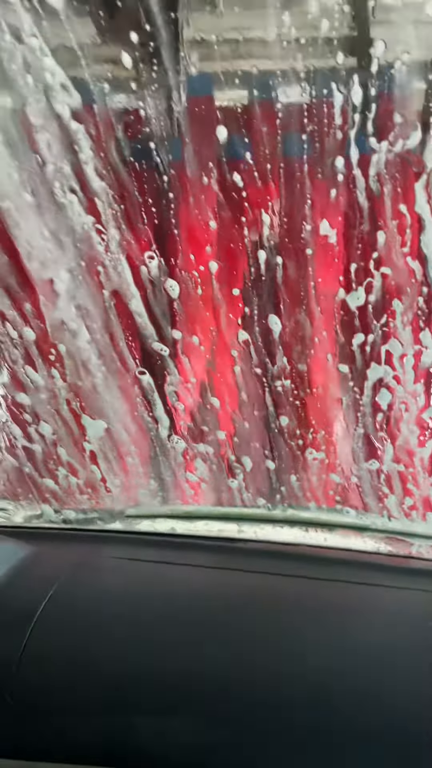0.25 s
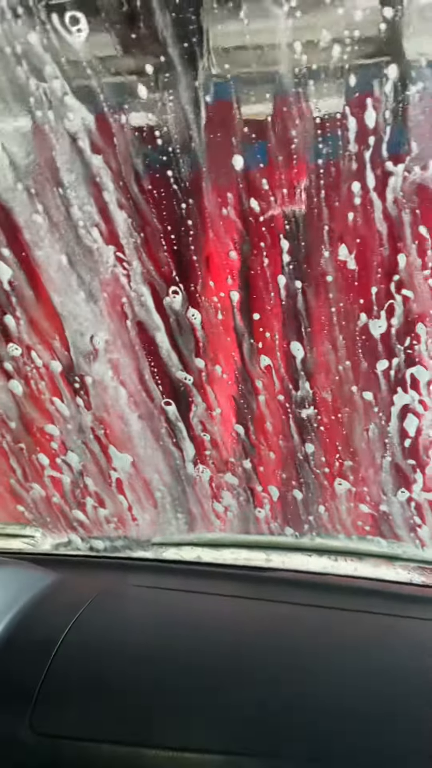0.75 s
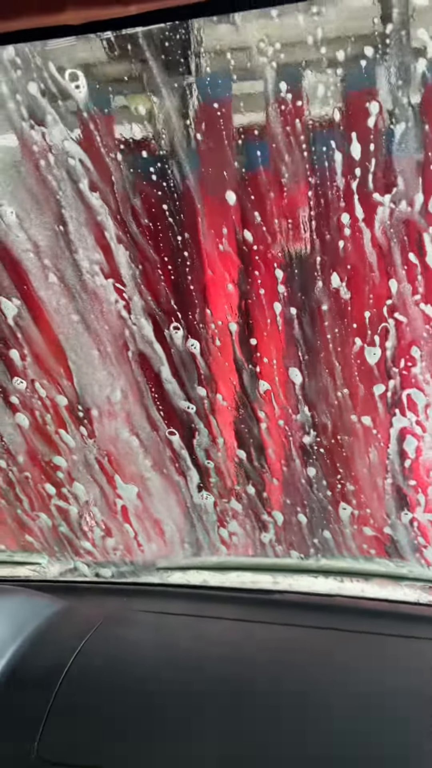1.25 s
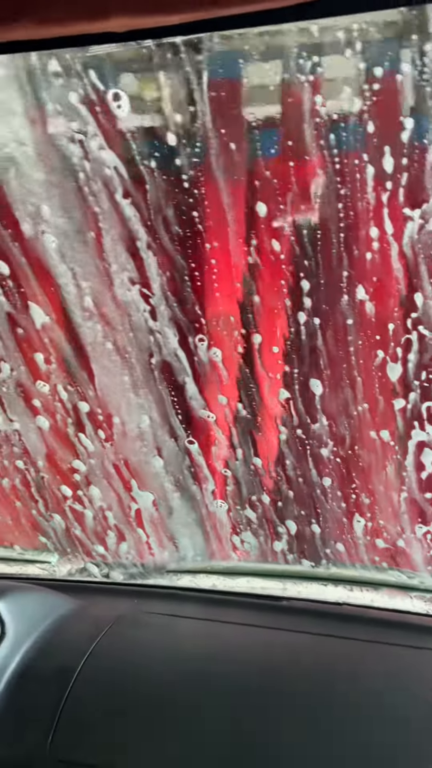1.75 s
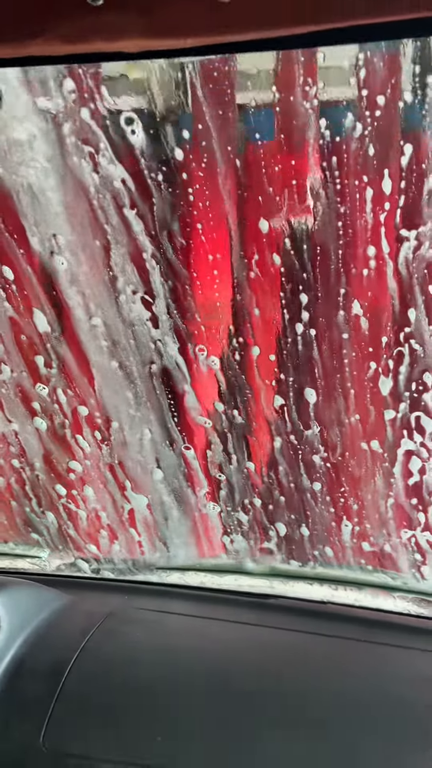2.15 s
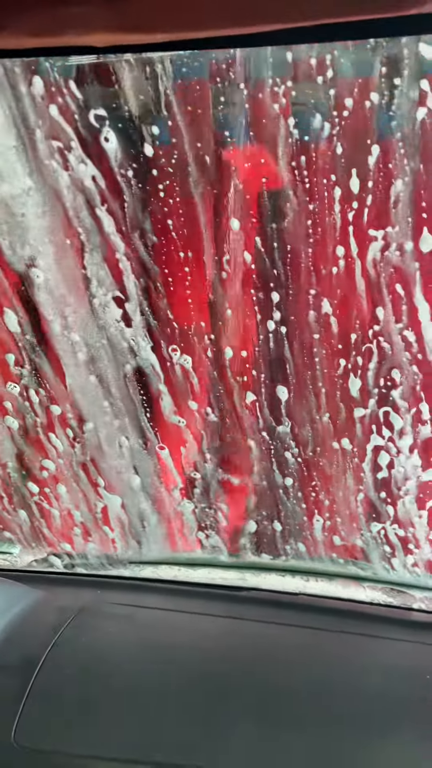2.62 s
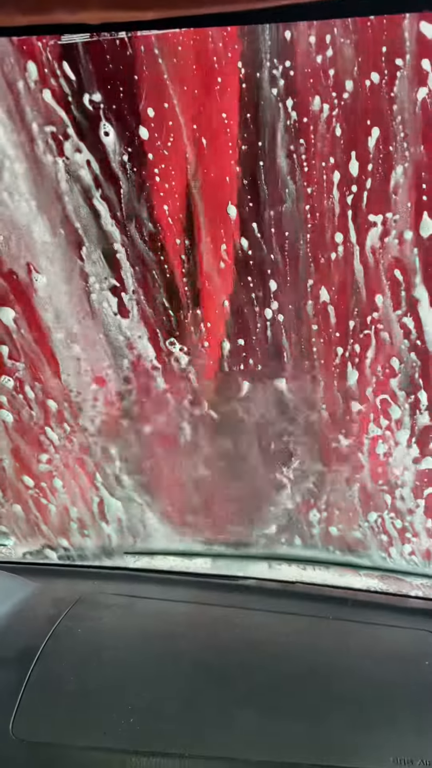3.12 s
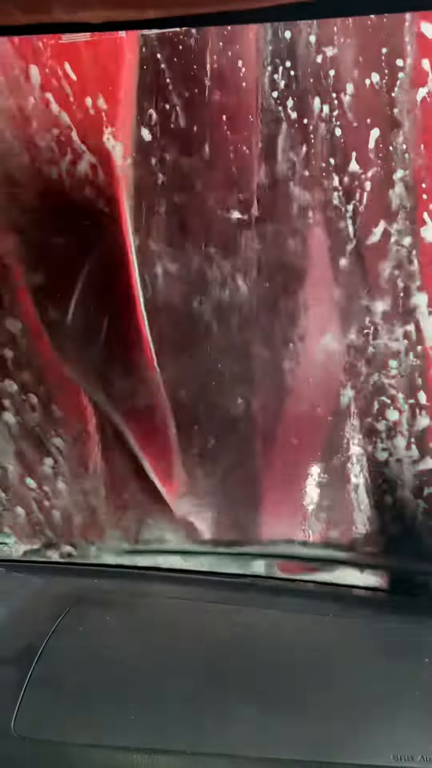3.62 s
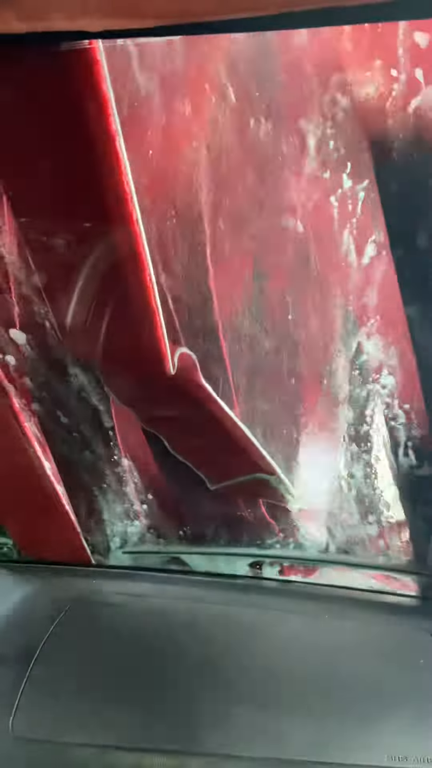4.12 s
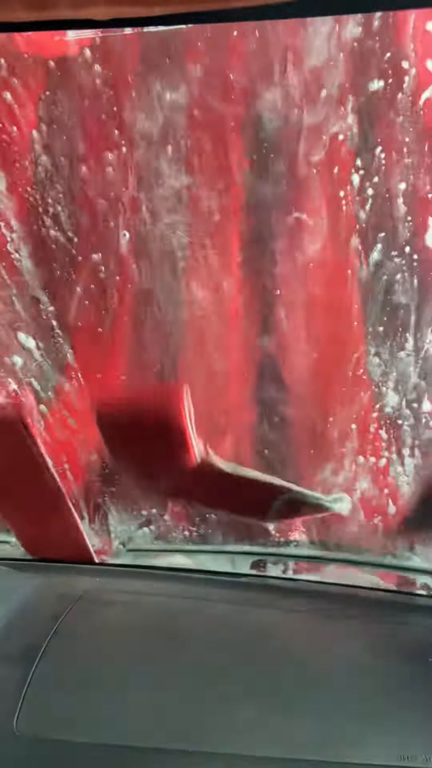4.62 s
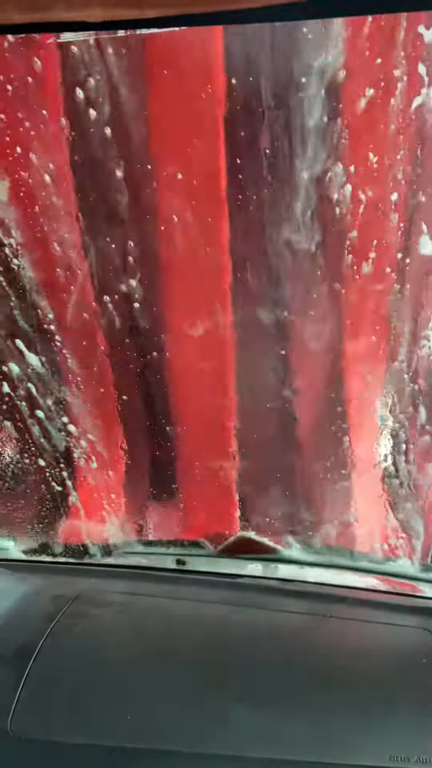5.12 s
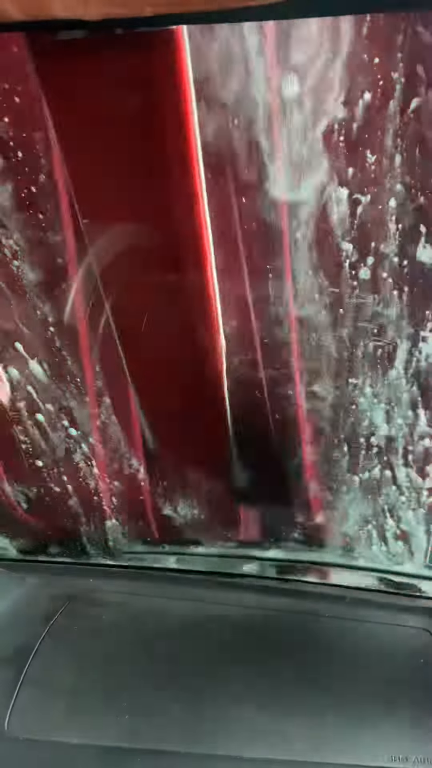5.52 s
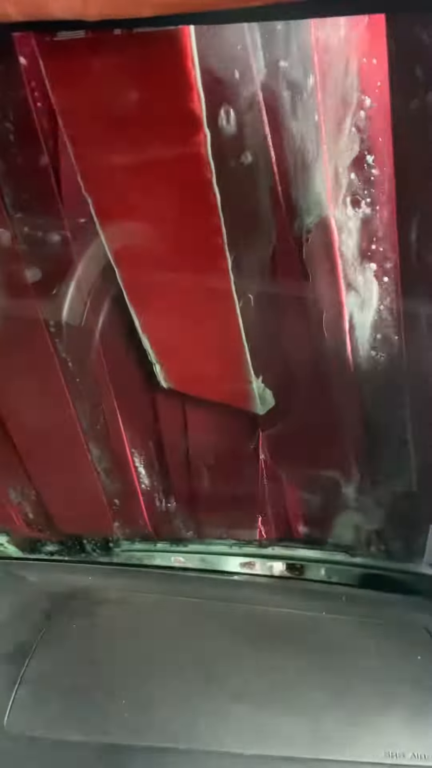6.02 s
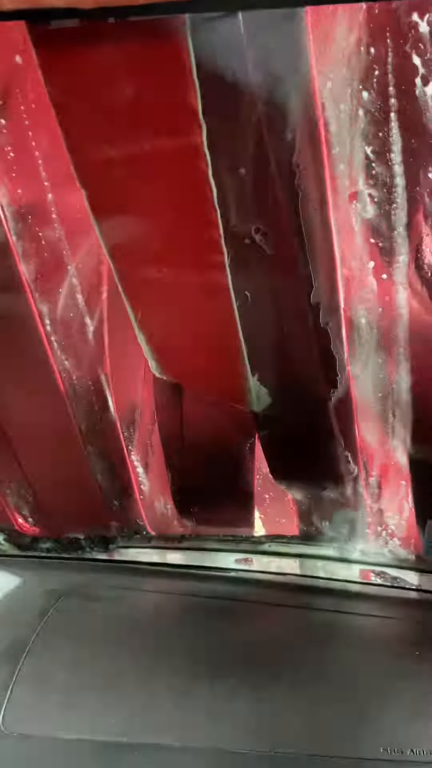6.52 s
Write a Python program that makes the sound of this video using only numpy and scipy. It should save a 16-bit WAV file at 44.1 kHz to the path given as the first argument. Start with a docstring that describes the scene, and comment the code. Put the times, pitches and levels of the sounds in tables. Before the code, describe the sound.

Soaked brush strips whip and thud against a car's glass and panels, water hissing and pattering, above a muffled boom of machinery.

```python
"""Wet swishes over a low rumble: the inside of a closed car while a spinning brush washes it.
Cloth strips whip the car: bursts of random drops splash, ping and hiss on the glass and drum the panels.
Some strips slap flat or crack at their tips; thuds and knocks, strong and faint, ring the shell's own notes.
Behind them, filtered noise makes the boom and drumming of pumps and fans, and random drops the running
water. Two close microphone ports listen."""
import sys
import numpy as np
from scipy import signal
from scipy.fft import rfft, irfft, next_fast_len
from scipy.io import wavfile
from scipy.ndimage import uniform_filter1d

SR = 44100
rng = np.random.default_rng(int(sys.argv[2]) if len(sys.argv) > 2 else 0)


def unload_audio(sound):
    """Save the sound as a 16-bit wav file, at the path given as the first command line argument."""
    columns = np.transpose(np.atleast_2d(sound))
    # keep every value between -1 and 1, then stretch to whole-number steps
    steps = np.round(np.clip(columns, -1, 1) * 32767)
    wavfile.write(sys.argv[1], SR, steps.astype(np.int16))


N = 297674
T = np.arange(N) / SR                      # time [s]
SIZE = next_fast_len(N + SR // 10)         # a little spare room, so filters do not wrap round
HZ = np.maximum(np.arange(SIZE // 2 + 1) * SR / SIZE, 1)

# Cloth swishes, slopes before sharpening:
# (time of the top [s], spray level [dB], swell [dB/s], fade [dB/s], extra dull splash and panel sound [dB])
CLOTH_SWISHES = [(0.005, -39, 500, 205, 5.5), (0.1, -41.5, 1609, 100, 1), (0.223, -34.5, 470, 252, 0.5),
                 (0.345, -35, 422, 144, 1), (0.485, -38.5, 400, 300, 5), (0.536, -38, 1103, 132, 6.5),
                 (0.638, -37.5, 1200, 250, 3), (0.688, -35.5, 2000, 393, -6), (0.74, -44.5, 500, 252, -3),
                 (0.86, -41.5, 300, 75, 0), (1.02, -43.5, 302, 152, -6), (1.1, -47, 200, 200, -2),
                 (1.2, -39.5, 502, 103, -4), (1.385, -34, 205, 296, -13), (1.47, -38, 306, 137, -3.5),
                 (1.646, -30.5, 400, 298, -6), (1.738, -29.5, 901, 100, -1.5), (1.881, -32.5, 142, 192, 1),
                 (1.925, -38, 400, 498, 7), (1.962, -33.5, 2500, 120, 7), (1.99, -29.5, 400, 200, 5),
                 (2.104, -25.5, 650, 196, 5), (2.172, -31, 1200, 200, -5), (2.193, -27.5, 800, 117, 7),
                 (2.3, -29, 500, 117, 7.5), (2.403, -21.5, 650, 155, 6.5), (2.516, -18.5, 357, 300, 6.5),
                 (2.538, -20.5, 600, 500, -13), (2.582, -21, 1100, 245, 0), (2.619, -23.5, 700, 190, 8),
                 (2.66, -32, 498, 120, -8), (2.706, -16, 1100, 220, -1), (2.744, -22, 500, 300, -0.5),
                 (2.791, -21.5, 1198, 302, -2.5), (2.811, -21, 602, 216, -0.5), (2.881, -28, 2000, 300, 9),
                 (2.899, -12, 700, 500, -4), (2.927, -26, 600, 498, -8), (2.966, -32.5, 1200, 200, 4.5),
                 (2.996, -20, 500, 300, -0.5), (3.03, -34, 400, 400, -12), (3.093, -19, 900, 294, 2.5),
                 (3.179, -27, 1200, 300, 7.5), (3.206, -19.5, 1202, 350, -6), (3.264, -28, 1500, 200, 0),
                 (3.293, -30.5, 900, 150, -2), (3.392, -22.5, 700, 257, 2), (3.44, -33, 300, 300, -2.5),
                 (3.488, -41, 2006, 500, 13), (3.517, -14, 700, 350, -3.5), (3.545, -22, 600, 450, -1),
                 (3.631, -28.5, 550, 298, 1.5), (3.774, -24, 340, 402, -2), (3.875, -16.5, 1300, 350, -4.5),
                 (3.904, -23, 500, 400, -11), (3.967, -27.5, 2300, 235, -5.5), (4.12, -32, 600, 114, -6),
                 (4.267, -40, 252, 92, 2), (4.479, -33, 309, 302, 1), (4.574, -38, 600, 150, 5),
                 (4.65, -54, 400, 200, 8), (4.74, -31, 900, 147, -8), (4.988, -36.5, 300, 302, -9),
                 (5.053, -35.5, 200, 500, 2), (5.168, -38.5, 160, 303, 5), (5.485, -28, 798, 797, 2.5),
                 (5.523, -28.5, 898, 400, -1), (5.56, -30.5, 1498, 400, 2.5), (5.596, -37, 900, 500, 9),
                 (5.674, -31.5, 350, 155, 1), (5.794, -27.5, 500, 400, 4.5), (5.918, -30, 353, 350, -1),
                 (5.986, -20, 2500, 370, -26), (6.028, -28.5, 500, 125, 5.5), (6.184, -17, 702, 272, 1.5),
                 (6.256, -26, 2200, 303, 6.5), (6.303, -24, 1203, 200, 2.5), (6.331, -21.5, 400, 294, 2.5),
                 (6.377, -21.5, 2500, 250, 2), (6.415, -24.5, 600, 204, 6), (6.445, -24.5, 300, 350, 2),
                 (6.508, -22, 1500, 121, 3), (6.59, -27.5, 900, 194, -10), (6.62, -21.5, 1198, 252, 0.5),
                 (6.662, -8, 3005, 600, -5.5), (6.678, -16, 1200, 700, -5), (6.71, -20, 1400, 107, -3.5)]
# The brush along the car, read smoothly between rows: (time [s], steady mist between swishes [dB],
# cloth on the panels for a swish of -24.5 dB [dB], sizzle compared with spray [dB])
BRUSH_PATH = [(0, -42.5, -23.5, -17), (.8, -45, -26, -20.5), (1.3, -47, -14.5, -21.5),
              (2.0, -41, -27.5, -19), (2.5, -35.5, -31, -15), (2.8, -44, -21.5, -12.5),
              (3.2, -34.5, -24.5, -16), (3.7, -40.5, -20.5, -13.5), (4.0, -47, -17, -11.5),
              (4.6, -40.5, -25.5, -17.5), (5.1, -43, -28.5, -17.5), (5.4, -37.5, -20.5, -19),
              (5.7, -44.5, -26.5, -15), (6.2, -46.5, -33, -14), (6.75, -30, -23, -16)]
# Strips slapping flat on the glass: (time [s], strength [dB])
FLAT_SLAPS = [(0.21, -23), (0.44, -18), (0.692, -16), (2.612, -13), (2.709, -14.5), (2.899, -6),
              (3.091, -16), (3.179, -21.5), (3.262, -7.5), (3.519, -10), (3.63, -10.5), (3.756, -13),
              (4.472, -18), (4.64, -14), (4.774, -22), (4.905, -16), (5.265, -13.5), (5.335, -16),
              (5.443, -21), (5.492, -20), (6.46, -27), (6.664, -16), (6.736, -12.5)]
# Strip tips cracking on the glass: (time [s], strength [dB])
TIP_CRACKS = [(1.961, -20.5), (3.084, -19), (3.262, -21), (3.381, -35), (3.872, -28), (3.965, -32),
              (4.472, -34), (4.945, -32), (5.274, -20.5), (5.336, -26), (5.442, -14.5), (5.498, -14.5),
              (5.521, -27), (5.984, -29)]
# Low thuds and knocks in the shell, strong and faint:
# (time [s], strength [dB], pitch around which the shell rings most [Hz])
SHELL_THUDS = [(0.206, -1, 68), (0.317, -18, 304), (0.459, -11, 146), (0.688, -5.5, 120),
               (0.719, -18.5, 332), (0.991, -7, 75), (1.302, -18, 340), (1.434, -9.5, 87.6),
               (1.777, -12, 100), (1.871, -14, 144), (2.502, -12, 129), (2.611, -13.5, 332),
               (2.633, -4.5, 133), (2.696, -25, 324), (2.717, -4, 110), (2.873, -5.5, 121), (2.922, -2, 70),
               (3.178, -5, 132), (3.26, -16, 87), (3.458, -1.5, 90), (3.503, -8, 146), (3.528, -7, 105),
               (3.65, -10, 160), (3.661, -4.5, 81), (3.754, -8.5, 209), (3.794, -7, 119), (3.95, -2, 93),
               (3.965, -20, 302), (3.992, -3, 66), (4.016, -0.5, 67.4), (4.093, -9, 124),
               (4.107, -8.5, 137), (4.12, -1, 98), (4.123, -9.5, 69), (4.542, -9, 103), (4.771, -17.5, 330),
               (4.851, -27, 310), (4.855, -8.5, 85.4), (4.956, -5.5, 69.4), (5.109, -5.5, 62),
               (5.244, -20.5, 560), (5.273, -7.5, 138), (5.291, -8, 115), (5.342, -0.5, 100),
               (5.362, -11, 100), (5.428, -5.5, 117), (5.44, -16, 250), (5.452, -4, 113), (5.487, -4, 92),
               (5.497, -16, 250), (5.518, -3.5, 90), (5.542, -12, 91.5), (5.561, -4, 99), (5.577, -5.5, 86),
               (5.611, -7, 117.7), (5.732, -7, 60), (5.743, -16, 163), (5.836, -7, 103), (6.167, -7, 105),
               (6.459, -21, 560), (6.535, -20.5, 590), (6.664, -15.5, 580), (6.665, -16.5, 324)]
# The tunnel heard through the shell, before the trims in tunnel():
# (time [s], deep boom [dB], machinery drumming [dB], running water [dB])
TUNNEL_LEVELS = [(0.0, -23, -21.5, -27), (0.6, -22.5, -22, -24.5), (1.2, -19.5, -21, -28),
                 (1.8, -23, -21.5, -27), (2.3, -21.5, -22.5, -30), (2.65, -22, -21.5, -24),
                 (3.0, -20, -22, -30), (3.25, -18, -24, -25.5), (3.59, -18.5, -20.5, -26.5),
                 (3.9, -22.5, -21, -28), (4.2, -23, -26.5, -29.5), (4.72, -20, -22, -23.5),
                 (5.21, -20, -25, -24.5), (5.45, -20.5, -24.5, -29.5), (5.86, -22.5, -25, -28),
                 (6.2, -22, -23, -25.5), (6.75, -17.5, -26.5, -28.5)]
# Notes the shell rings at: (pitch [Hz], level [dB], time to fall 60 dB [s])
SHELL_MODES = [(45.4, 2, 0.11), (60.4, -5, 0.088), (83.8, -4, 0.13), (103, -4, 0.084), (117.7, -4.5, 0.067),
               (137.8, -7, 0.18), (165.7, 2.5, 0.19), (250, 6.5, 0.085), (316, 4.5, 0.092),
               (583, 3.5, 0.095)]
# Resonances of the glass, then of the panels: (pitch [Hz], width [Hz], gain at the peak [dB])
GLASS_MODES = [(1495, 46, -15), (2120, 17, -16), (2422, 44, -2.5), (2673, 93, -1), (2910, 290, -5.5),
               (3486, 53, -3), (3880, 40, -4.5), (6620, 165, 5)]
BODY_PANEL_MODES = [(268, 41, 0), (327, 51, 2), (391, 19, -8.5), (464.5, 32, -7.5), (555.4, 10, -0.5),
                    (1174, 78, -6.5), (1387, 21, -1.5)]
# Tone colours, from the swishes to the background: (frequency [Hz], relative gain [dB])
SPRAY_COLOUR = [(1700, -35), (2500, -1.5), (3200, 2.5), (4200, 0.5), (5200, -1), (6200, -9), (6800, -20),
                (7300, -38), (8500, -101)]
SPLASH_COLOUR = [(800, -11), (1300, 3.5), (1800, 2.5), (2400, 2), (3200, -13)]
SIZZLE_COLOUR = [(6500, -84), (7800, 3), (9500, 5.5), (11000, -1.5), (13000, -3), (15900, -11)]
PANEL_COLOUR = [(180, -2), (320, -5.5), (600, -3), (900, -7), (1300, -12), (1900, -42)]
CRACK_COLOUR = [(300, -10), (600, -3.5), (1200, -6), (2200, -4.5), (4000, -13), (6200, -15.5), (7400, -38),
                (10000, -31), (13000, -43)]
BOOM_COLOUR = [(25, -3), (36, -1.5), (48, 11.5), (81, -2.5), (110, -3.5), (140, -43)]
DRUMMING_COLOUR = [(47, -43), (80, -2.5), (129, 4), (215, -5.5), (330, -17.5), (430, -42), (730, -120)]
WATER_COLOUR = [(180, -28.5), (300, 2), (500, 0.5), (800, -5), (1300, -12.5), (2000, -15.5), (4000, -26.5),
                (6000, -73), (9000, -41), (15500, -51)]
# The two ports: (frequency [Hz], phase by which the left leads [radians],
# unshared sound compared with shared [dB], left compared with right [dB])
MICROPHONE_PORTS = [(25, 0, -52, 0), (60, 0, -40, -.1), (130, 0, -30, -.6), (340, 0.05, -13, -3),
                    (690, .35, -6.5, .5), (1100, .1, -4, 1), (1700, .4, -6, 1), (2200, 1.2, -4, 2),
                    (2600, 2.1, -8, 0), (3600, .9, -8, 0), (4600, .9, -2, 1), (5700, 1.1, -7, 1),
                    (7300, 3.14, -16, 0), (8800, 4.7, -7, 0), (10500, 6.28, -16, 0), (12000, 8.2, -6, 0),
                    (13500, 9.42, -18, 0), (14500, 9.8, -10, 0), (15600, 12.56, -12, 0)]

PANEL_FOLLOWS = 0.57                       # panel dB gained per dB of swish
SPLASH_DB, SPLASH_FOLLOWS = -3, 0.57       # start level from spray; share of the panel's lead over spray
MIST_WAVERS_PER_S, MIST_WAVERS_DB = 12, 1.4   # before sharpening
SLAP_RISE_S, SLAP_DECAY_S, SLAP_PANEL_DB, SLAP_SPLASH_DB = 0.0055, 0.013, 0.5, -11
CRACK_RISE_S, CRACK_DECAY_S = 0.0012, 0.0064
DROPLETS_PER_S, DROPLET_DB = 500, -13.5    # big drops; gain on the spray's swell
DROPLET_CYCLES = 30.0                      # cycles for a ring to fall 60 dB
STOP_HZ = 16100


def swishes():
    """Flung water splashes, patters and rings on the glass, fine mist sizzles, cloth drums the panels."""
    spray_gain, splash_gain, sizzle_gain, panel_gain = swish_gains(sharpen=(1.65, 1.29, 2.25, 1.18))
    slap = slaps(FLAT_SLAPS, SLAP_RISE_S, SLAP_DECAY_S)
    splash_gain = np.hypot(splash_gain, from_db(SLAP_SPLASH_DB) * slap)
    panel_gain = np.hypot(panel_gain, from_db(SLAP_PANEL_DB) * slap)

    patter = from_db(-3.5) * coloured(drops(14000, 0.91), SPRAY_COLOUR)
    spray = spray_gain * (patter + from_db(DROPLET_DB) * droplets())
    splash = splash_gain * from_db(-4.5) * coloured(drops(8000, 0.73), SPLASH_COLOUR)
    sizzle = sizzle_gain * from_db(-2.0) * coloured(drops(13000, 1.2), SIZZLE_COLOUR)
    panel = panel_gain * from_db(-4.0) * coloured(drops(3000, 0.55), PANEL_COLOUR)

    water = patchy(splash + spray + sizzle, 1266, 7470, depth_db=2.5, count=7)
    water = splats(per_s=100, decay_s=0.002, depth=0.087) * water
    crack = slaps(TIP_CRACKS, CRACK_RISE_S, CRACK_DECAY_S) * coloured(drops(9000, 2.3), CRACK_COLOUR)
    return rung(water, GLASS_MODES, 23.0, 3.5) + rung(panel, BODY_PANEL_MODES, 18, 2.3) + crack


def swish_gains(sharpen):
    """Each swish swells and dies at a near-steady dB rate over a wavering mist; all add in power.

    Gives one gain each for spray, splash, sizzle and panel; sharpen steepens the shape for each."""
    s, db, swell, fade, dull_db = np.transpose(CLOTH_SWISHES)[:, :, None]
    t = T[::44]                            # about one step per millisecond is enough
    at_s, *brush = np.transpose(BRUSH_PATH)
    mist_db, cloth_db, sizzle_db = [np.interp(t, at_s, column) for column in brush]
    mist = flicker(MIST_WAVERS_PER_S, MIST_WAVERS_DB)[::44]

    away_db = np.where(t < s, (s - t) * swell, (t - s) * fade)
    knee_db = 5.0                          # the strip lies flat for a moment: the top is rounded
    away_db = np.hypot(away_db, knee_db) - knee_db

    # one row per swish, the mist in the last row
    tops_db = np.vstack([db + 0 * t, mist_db])
    dull_db = np.vstack([dull_db, [0]])
    panel_db = cloth_db + PANEL_FOLLOWS * (tops_db + 24.5) + dull_db
    splash_db = tops_db + dull_db / 2 + SPLASH_DB + SPLASH_FOLLOWS * (panel_db - tops_db)
    for level_db, steep in zip([tops_db, splash_db, tops_db + sizzle_db, panel_db], sharpen):
        swish_power = np.sum(from_db(level_db[:-1] - steep * away_db) ** 2, axis=0)
        mist_power = (mist ** steep * from_db(level_db[-1])) ** 2
        yield np.sqrt(np.interp(T, t, uniform_filter1d(swish_power + mist_power, size=2)))


def slaps(rows, rise_s, decay_s):
    """Each blow is a quick swell that dies away."""
    s, db = np.transpose(rows)
    hits = np.full(N, 1e-18)               # tiny floor keeps the filters fast
    hits[(s * SR).astype(int)] = from_db(db)
    rise, fall = np.exp(-1 / (SR * np.array([rise_s, decay_s])))
    dying = signal.lfilter([1], [1, -fall], hits)
    return signal.lfilter([1 - rise], [1, -rise], dying)


def droplets():
    """Big drops strike one by one and ring briefly, each at one of 14 pitches; overall rms is 1."""
    hits = drops(DROPLETS_PER_S, 3.2)
    pitch_number = rng.integers(0, 14, N)
    out = 0
    for k, hz in enumerate(np.geomspace(1300, 5800, 14)):
        r, w = from_db(-60 * hz / (DROPLET_CYCLES * SR)), 2 * np.pi * hz / SR
        chosen = hits * (pitch_number == k) + 1e-18
        out = out + signal.lfilter([0, np.sin(w)], [1, -2 * r * np.cos(w), r * r], chosen)
    return out / np.sqrt(np.mean(out ** 2))


def patchy(x, low_hz, high_hz, depth_db, count):
    """Water lands unevenly: each slice of the band swells and thins on its own."""
    place = np.log(HZ / low_hz) / np.log(high_hz / low_hz) * (count - 1)
    place = np.clip(place, 0, count - 1)
    whole = rfft(x, SIZE)
    out = 0
    for k in range(count):
        overlap = np.maximum(1 - abs(place - k), 0)
        out = out + irfft(whole * overlap, SIZE)[:, :N] * flicker(31.5, depth_db)
    return out


def thuds():
    """Each thud or knock is a push that rings the shell, most in the modes nearest its pitch."""
    strengths_db = rng.normal(0, 1, (len(SHELL_THUDS), 2, len(SHELL_MODES)))
    out = np.zeros((2, N))
    for k, (hz, mode_db, t60) in enumerate(SHELL_MODES):
        push = np.full((2, N), 1e-18)
        for (s, db, near_hz), own_db in zip(SHELL_THUDS, strengths_db[:, :, k]):
            off_db = 85.0 * np.log2(hz / near_hz) ** 2   # modes far from that pitch stay quiet
            # the second row changes sign from mode to mode
            push[:, int(s * SR)] += from_db(db + mode_db - off_db + own_db) * [1, (-1) ** k]
        r, w = from_db(-60 / (t60 * SR)), 2 * np.pi * hz / SR
        out += signal.lfilter([0, np.sin(w)], [1, -2 * r * np.cos(w), r * r], push)
    # a soft start: the treble is taken off
    return signal.sosfilt(signal.butter(4, 800, fs=SR, output="sos"), out)


def tunnel():
    """Machinery booms and drums through the shell, water runs and gurgles over it."""
    s, *levels = np.transpose(TUNNEL_LEVELS)
    boom_db, machine_db, water_db = [np.interp(T, s, column) for column in levels]
    boom = from_db(boom_db) * flicker(6.7, 1.6)
    boom = boom * coloured(rng.standard_normal((2, N)), BOOM_COLOUR)
    drumming = from_db(machine_db + 2.0) * flicker(27, 0.45)
    drumming = drumming * coloured(rng.standard_normal((2, N)), DRUMMING_COLOUR)
    water = from_db(water_db - 5.0) * splats(per_s=20, decay_s=0.014, depth=0.27)
    water = water * coloured(drops(9000, 2.1), WATER_COLOUR)
    return boom + drumming + rung(water, BODY_PANEL_MODES, 1.86, 5.4)


def rung(x, modes, rate, depth_db):
    """The sound plus its ringing; as the contact wanders, each mode comes and goes."""
    out = x.copy()
    for hz, width_hz, db in modes:
        r, w = np.exp(-np.pi * width_hz / SR), 2 * np.pi * hz / SR
        top = (1 - r * r) / 2 * from_db(db)
        feed = x * flicker(rate, depth_db)
        out += signal.lfilter([top, 0, -top], [1, -2 * r * np.cos(w), r * r], feed)
    return out


def splats(per_s, decay_s, depth):
    """A gain that jumps as each clump of water lands and sinks back; rms 1."""
    clumps = rng.exponential(1, N) * (rng.random(N) < per_s / SR)
    gain = 1 + depth * signal.lfilter([1], [1, -np.exp(-1 / (decay_s * SR))], clumps)
    return gain / np.sqrt(np.mean(gain ** 2))


def drops(per_s, spread_db):
    """Random impacts of uneven size: one shared and one unshared stream."""
    sizes = from_db(spread_db * np.minimum(rng.exponential(1, (2, N)), 5))
    sizes = sizes * rng.standard_normal((2, N))
    return sizes * (rng.random((2, N)) < per_s / SR)


def flicker(rate, depth_db):
    """A gain that wanders at random, faster for a higher rate; depth_db is its typical swing."""
    r = np.exp(-2 * np.pi * rate * 32 / SR)   # worked out at every 32nd sample
    slow = signal.lfilter([1], [1, -2 * r, r * r], rng.standard_normal(N // 32 + 1002))[1000:]
    return from_db(depth_db * np.interp(np.arange(N) / 32, np.arange(len(slow)), slow / slow.std()))


def coloured(x, spectrum):
    """Shape a sound by a tone colour that falls away beyond its ends; rms 1."""
    hz, db = np.transpose(spectrum)
    ends = np.minimum(HZ / hz[0], 1) ** 2 * np.minimum(hz[-1] / HZ, 1) ** 2
    y = irfft(rfft(x, SIZE) * from_db(at_hz(hz, db)) * ends, SIZE)[..., :N]
    return y / np.sqrt(np.mean(y ** 2))


def at_hz(hz, values):
    """Read a table column at every frequency, on a logarithmic pitch scale."""
    return np.interp(np.log(HZ), np.log(hz), values)


def from_db(db):
    """Turn decibels into a gain."""
    return 10 ** (np.asarray(db) / 20)


def scene():
    """Row 0 reaches both ports alike, row 1 with opposite sign; the left port leads in phase."""
    shared, unshared = rfft(swishes() + thuds() + tunnel(), SIZE)
    hz, lead, unshared_db, balance_db = np.transpose(MICROPHONE_PORTS)
    part = from_db(at_hz(hz, unshared_db))
    tilt = from_db(at_hz(hz, balance_db) / 2)
    turn = np.exp(.5j * np.interp(HZ, hz, lead))   # half the lead on each side
    left = (shared + part * unshared) * tilt * turn
    right = (shared - part * unshared) / tilt / turn
    return irfft(np.array([left, right]) / np.sqrt(1 + part ** 2), SIZE)[:, :N]


def record(dry):
    """The microphone drops the deepest bass and rounds peaks; the top is cut steeply."""
    dry = signal.sosfilt(signal.butter(2, 32, "high", fs=SR, output="sos"), dry)
    rounded = 1.011 * np.tanh(dry / 1.236)
    return signal.sosfilt(signal.cheby2(14, 70, STOP_HZ, fs=SR, output="sos"), rounded)


dry = scene()
out = record(dry)
unload_audio(out)
```